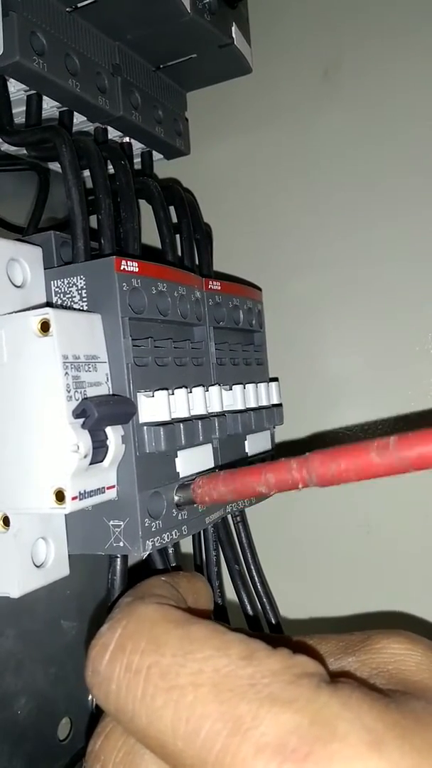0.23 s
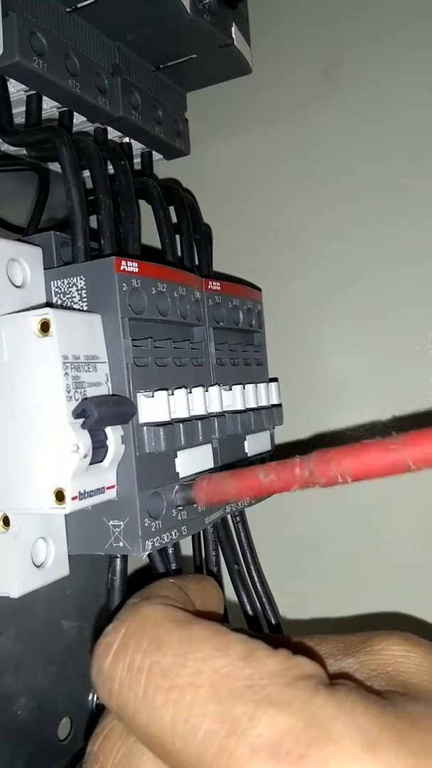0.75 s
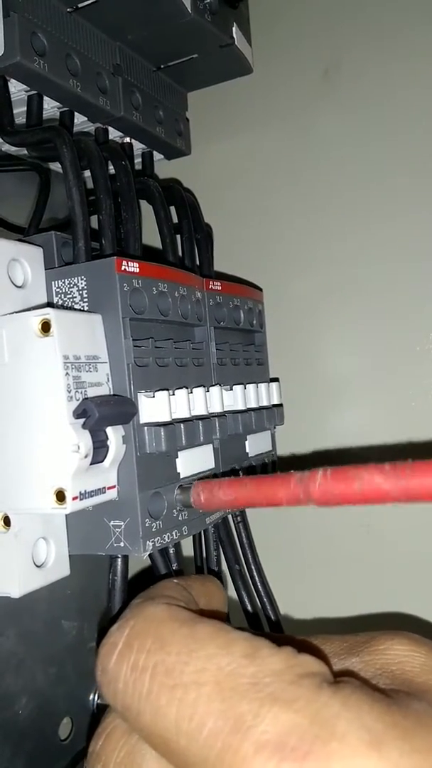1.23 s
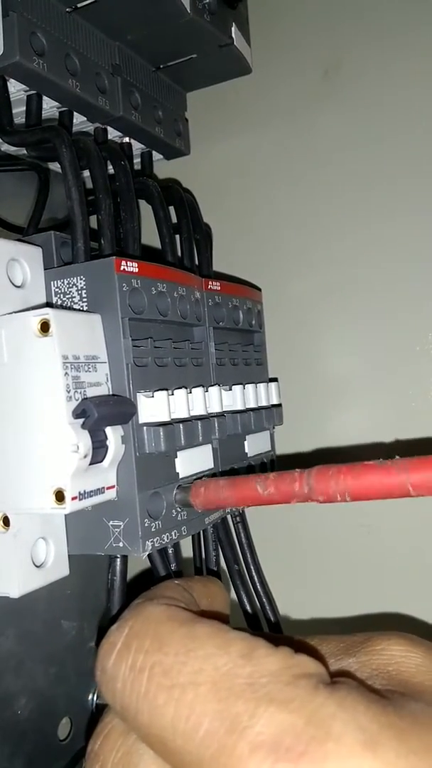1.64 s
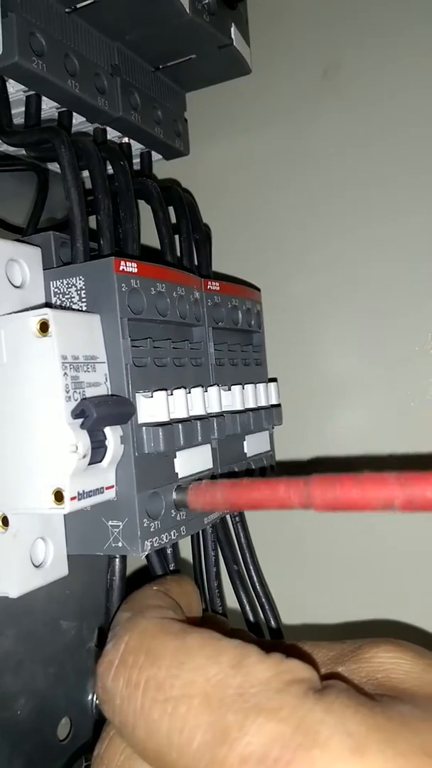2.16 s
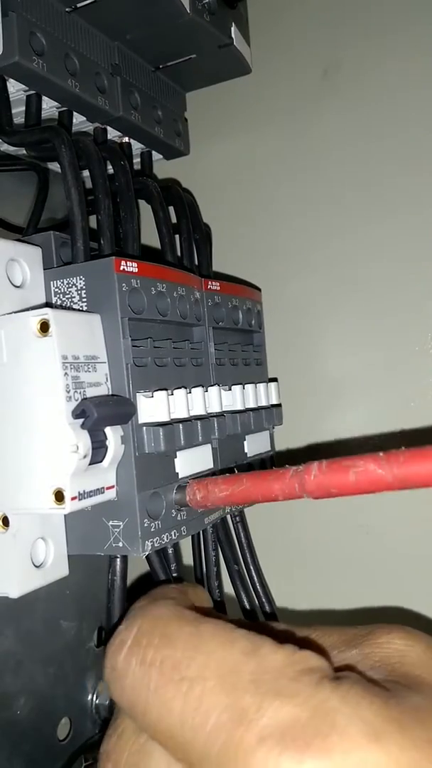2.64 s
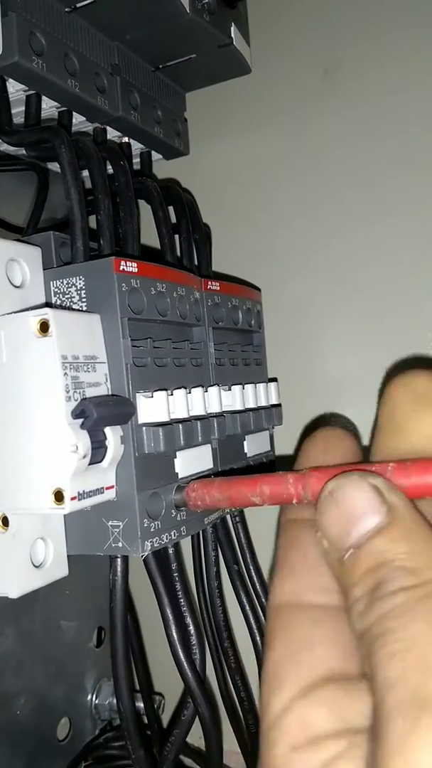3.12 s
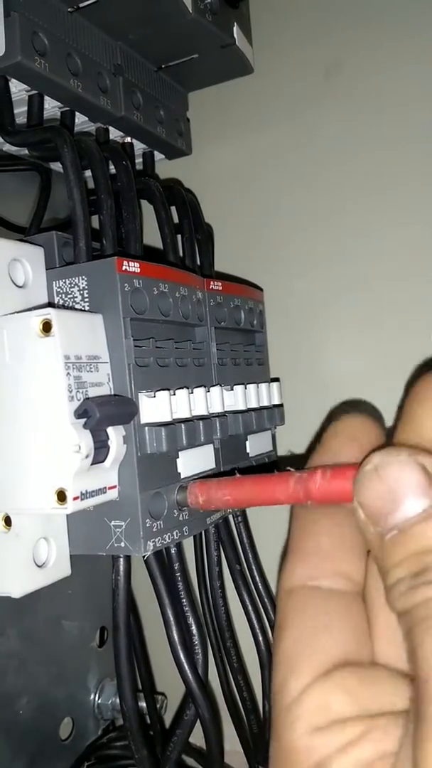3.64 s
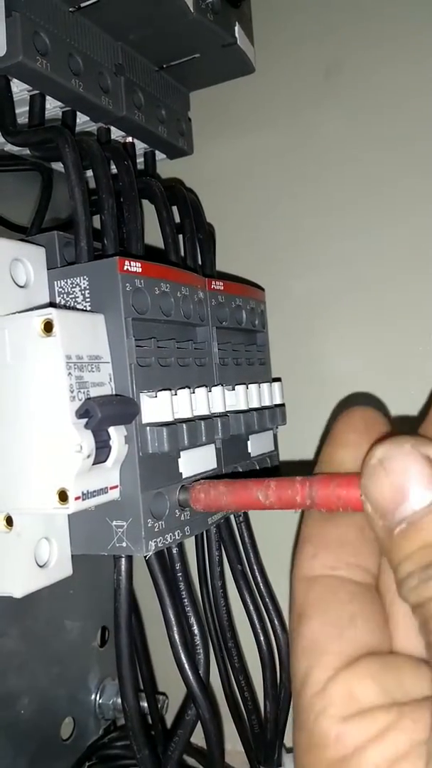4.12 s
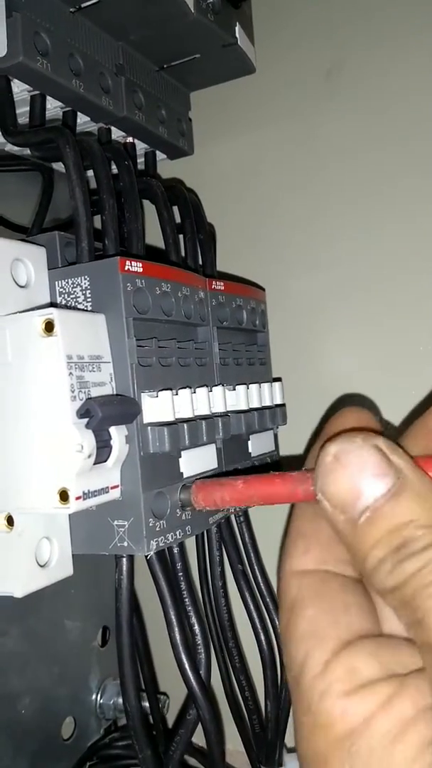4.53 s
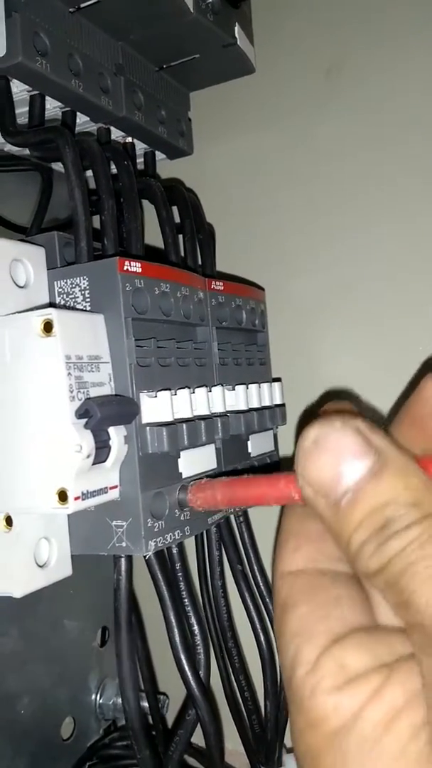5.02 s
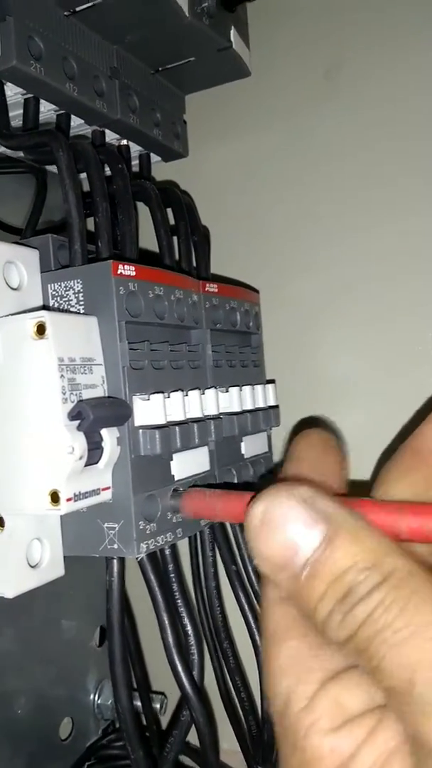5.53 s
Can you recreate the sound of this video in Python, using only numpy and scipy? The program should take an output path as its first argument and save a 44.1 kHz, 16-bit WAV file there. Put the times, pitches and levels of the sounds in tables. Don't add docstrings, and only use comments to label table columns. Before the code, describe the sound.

Sharp metallic clicks and dry scrapes of a screwdriver slipping in a terminal screw, very close, inside a small steel cabinet, after early low handling rumble.

```python
import sys
import numpy as np
from scipy import signal
from scipy.io import wavfile
from scipy.ndimage import uniform_filter1d

SR = 44100
rng = np.random.default_rng(int(sys.argv[2]) if len(sys.argv) > 2 else 0)


def transcribe(u):
    v = np.clip(np.atleast_2d(u).T, -1, 1)
    q = np.round(v * 32767).astype(np.int16)
    wavfile.write(sys.argv[1], SR, q)


def magnitude_from_level(level_db):
    exponent = np.asarray(level_db, float) / 20
    return 10 ** exponent


N = 254898


def evened(x):
    return x / np.sqrt(np.mean(x ** 2) + 1e-20)


def smoothed_twice(x, width):
    return uniform_filter1d(uniform_filter1d(x, width), width)


def read(points, hz):
    f, value = np.transpose(points)
    return np.interp(np.log(hz + 1), np.log(f + 1), value)


def colour(points):
    log_gain = np.log(magnitude_from_level(read(points, abs(np.fft.fftfreq(4096, 1 / SR)))))
    phase = -signal.hilbert(log_gain).imag
    h = np.fft.ifft(np.exp(log_gain + 1j * phase)).real[:1024]
    return h / np.linalg.norm(h)


def rings(modes, detune=0, uneven_db=0, seconds=0.27):
    t = np.arange(round(SR * seconds)) / SR
    hz, db, t60 = np.transpose(modes)[:, :, None]
    shift, lift = rng.standard_normal((2, len(modes), 1))
    decay = magnitude_from_level(db + uneven_db * lift - 60 * t / t60)
    h = (decay * np.sin(2 * np.pi * hz * (1 + detune * shift) * t)).sum(0)
    return h / np.linalg.norm(h)


def through(x, h):
    return signal.oaconvolve(np.atleast_2d(x), np.atleast_2d(h), axes=1)[:, :np.shape(x)[-1]]


def curve(rows, column, rest_db):
    open_s = 0.0047
    rows = np.array(rows)[:, :, None]
    t = np.arange(0, N + 64, 64) / SR
    start, hold, fade = rows[:, 0], rows[:, 1], rows[:, 2]
    age = t - start
    level = magnitude_from_level(rows[:, column] - fade * np.maximum(age - hold, 0))
    each = np.clip(age / open_s, 0, 1) * level
    return np.interp(np.arange(N) / SR, t, np.sqrt((each ** 2).sum(0) + magnitude_from_level(2 * rest_db)))


def grit(spread_db, size=N):
    grain = magnitude_from_level(spread_db * np.minimum(rng.exponential(1, (2, size)), 5))
    return evened(grain * rng.standard_normal((2, size)))


def unsteady(depth_db, width):
    return magnitude_from_level(depth_db * evened(smoothed_twice(rng.standard_normal(N), width)))


# (start [s], hold [s], fade [dB/s], scrape [dB], housing rustle [dB])
RUBS = [(0, 0.023, 279, -59.5, -68), (.176, 0.1, 171, -49.5, -64.5), (.43, 0.086, 105, -55, -74),
        (.835, 0.3, 65, -52.5, -71), (1.3, 0.1, 52, -55, -71), (1.7, 0.13, 206, -52, -74.5),
        (2.025, 0.12, 194.5, -51, -70), (2.25, 0.18, 64, -58.5, -86), (2.588, 0.069, 109, -48, -70),
        (2.86, 0.12, 227.5, -50.5, -84), (3.29, 0.043, 903, -69, -98), (3.33, 0.054, 150, -39.5, -75.5),
        (2.312, 0.051, 150, -47.5, -65), (3.55, .05, 200, -54, -74), (3.43, .03, 97.5, -47.5, -87),
        (3.48, 0.034, 59.5, -50, -76.5), (.95, .04, 152, -46.5, -59.5), (1.185, 0.024, 152, -47, -62.5),
        (1.65, 0.033, 152, -51, -64), (3.64, 0.062, 63.5, -45.5, -70), (3.955, .07, 200.5, -36.5, -53.5),
        (4.72, 0.032, 250, -45, -62), (5.16, 0.036, 298, -51, -62.5), (4.03, 0.11, 133, -36.5, -59),
        (4.35, 0.06, 207, -55, -72.5), (4.588, 0.24, 156, -53, -84), (4.965, 0.011, 174.5, -45.5, -63.5),
        (5.338, 0.0078, 205.5, -45.5, -54.5), (5.43, 0.0099, 241, -45, -62.5),
        (5.66, 0.062, 102, -55.5, -51)]
# (frequency [Hz], level [dB])
SCRAPE_COLOUR = [(3000, 6), (4700, 1.5), (5300, 9.5), (6800, 0.5), (9000, 1), (12000, 8.5), (14000, 13.5),
                 (16000, 0.5)]


def scrape(rough):
    return curve(RUBS, column=3, rest_db=-82.5) * rough * through(grit(spread_db=1.8), colour(SCRAPE_COLOUR))


# (frequency [Hz], density [dB per Hz])
RUSTLE_COLOUR = [(240, -40), (400, -14.5), (598, 4), (812, -15.5), (1040, -3), (2260, -12.5), (3600, -17),
                 (5000, -15), (6500, -10), (11000, -120)]


def rustle():
    return curve(RUBS, column=4, rest_db=-83) * through(grit(spread_db=3.0), colour(RUSTLE_COLOUR))


# (start [s], hold [s], fade [dB/s], plate rumble [dB], deep rumble [dB])
GRIPS = [(.012, 0.013, 602, -40, -56), (.033, 0.074, 403, -34, -60), (.075, 0.067, 404, -32.5, -63),
         (.13, 0.02, 507, -30.5, -41), (.175, 0.049, 400, -31.5, -66), (.395, 0.0049, 600, -51, -52),
         (.474, 0.011, 600, -39.5, -46), (.54, 0.0043, 600, -50, -65), (.65, 0.0095, 506, -50, -65),
         (.23, 0.13, 254, -36.5, -74), (.43, 0.11, 40.5, -54.5, -69.5), (2.585, 0.18, 301, -61, -53.5),
         (2.8, 0.082, 295, -70, -50), (2.89, 0.061, 306, -52, -50.5), (2.99, .05, 500, -60.5, -54),
         (4.94, 0.0117, 497, -61.5, -50), (5.39, 0.0084, 500, -52, -64), (4.085, 0.05, 136, -49, -66),
         (1.63, 0.017, 205, -45.5, -52.5), (3.61, 0.033, 145, -46.5, -61), (3.98, 0.024, 499, -56, -57.5),
         (4.19, 0.0092, 603, -53, -74.5), (4.365, 0.011, 498, -56.5, -70), (4.7, 0.048, 302.5, -72, -61),
         (5.32, 0.026, 64, -64, -57), (5.66, 0.024, 296.5, -47, -71), (5.72, 0.055, 100, -47, -76)]
# (frequency [Hz], level [dB], t60 [s])
PLATE = [(161.1, 17.5, 0.055), (221.9, 4.5, 0.37), (251.6, 9, 0.14), (283.3, 1.5, 0.2), (408.5, -25, 0.027),
         (474, -16.5, 0.056), (750, -24.5, 0.083)]
# (frequency [Hz], level [dB], t60 [s])
PLATE_DEEP = [(61.6, -14.5, .06), (89.5, 1.5, 0.048), (128, 0, 0.057)]


def rumble():
    shared, own = rng.standard_normal((2, N))
    hand = unsteady(depth_db=2.2, width=400) * (shared + .1 * own * [[1], [-1]])
    middle = evened(through(hand, rings(PLATE)))
    deep = evened(through(through(hand, rings(PLATE_DEEP)), np.hanning(150)))
    return curve(GRIPS, column=3, rest_db=-69) * middle + curve(GRIPS, column=4, rest_db=-72) * deep


# (start [s], end [s], frequency [Hz], width [Hz], level [dB])
SQUEAKS = [
    (0.039, 0.14, 616, 7.7, -45.5),
    (0.281, 0.363, 598, 21, -55),
    (0.387, 0.504, 593, 30, -62),
    (0.516, 0.622, 608, 28, -64),
    (0.956, 1.1, 1100, 90, -62.5),
    (2.903, 3.048, 611, 25, -74.5),
    (3.499, 3.958, 1096, 47, -66.5),
    (4.419, 4.657, 1790, 132, -81),
    (5.216, 5.617, 1550, 70, -75),
]


def squeaks():
    out = np.zeros(N)
    for start, end, hz, width, db in SQUEAKS:
        part = out[round(start * SR):round(end * SR)]
        tone = through(rng.standard_normal(len(part)), rings([(hz, 0, 2.2 / width)]))[0]
        part += magnitude_from_level(db) * evened(tone) * signal.windows.tukey(len(part), .6)
    return out


# (frequency [Hz], level [dB], t60 [s])
SHAFT = [(4050, -2, .025), (5650, 0, .03), (6200, -2, .025), (6710, 6, .016), (7430, 2, .03),
         (7900, 0, .025), (8900, 2, .03), (9510, 0, .025), (10700, 0, .03), (12100, 0, .03)]
# (frequency [Hz], level [dB], t60 [s])
HOUSING = [(760, 2, .04), (915, -8, .03), (1250, -6, .022), (1560, -8, .025), (1870, -6, .02),
           (2080, 1, .016), (2330, -8, .02), (2770, -8, .015)]
# (frequency [Hz], level [dB], t60 [s])
THUD = [(200, -14, .08), (275, -3, .055), (395, 0, .038), (520, -4, .025), (620, -4, .035), (780, -8, .03),
        (1010, -15, .02)]


def strike(db, knock_db, thud_db, ms):
    size = 4000
    ms = np.clip(ms, .2, 5)
    u = np.arange(size) / SR * 680 / ms
    swell = u * np.exp(1 - u)
    late_ms = np.arange(size) * 1000 / SR - 1.47 * ms
    rattle = magnitude_from_level(db - 14.5 - late_ms) * np.clip(late_ms, 0, 1)
    bunched = magnitude_from_level(2 * evened(uniform_filter1d(rng.standard_normal(size), size=30)) - .5)
    force = (magnitude_from_level(db) * swell ** 3.4 + rattle) * bunched

    lean = magnitude_from_level([[.75], [-.75]])
    chatter = magnitude_from_level(-0.5) * force * grit(spread_db=3.5, size=size) * lean
    click = chatter + magnitude_from_level(-18) * through(chatter, rings(SHAFT, detune=.02, uneven_db=4, seconds=.04))

    drive = magnitude_from_level(knock_db) * force * grit(spread_db=2.0, size=size)
    knock = drive + magnitude_from_level(-9) * through(drive, rings(HOUSING, detune=.04, uneven_db=5, seconds=.05))

    shared, own = rng.standard_normal((2, size))
    blow = magnitude_from_level(db - 2) * swell ** 110
    jolt = 1.72 * force + magnitude_from_level(db - 18) * np.exp(-u / 9) * (u > 1)
    push = magnitude_from_level(thud_db) * (blow + jolt * (shared + 0.17 * own * [[1], [-1]]))
    thud = through(push, rings(THUD, detune=.05, uneven_db=2, seconds=.09))
    return np.array([click, knock, thud])


def laid_out(rows):
    out = np.zeros((3, 2, N + 4000))
    for s, db, knock_db, thud_db, ms in rows:
        at = round((s - .0036) * SR)
        out[:, :, at:at + 4000] += strike(db, knock_db, thud_db, ms)
    return out[:, :, :N]


# (time [s], click [dB], housing knock [dB re click], plate thud [dB re click])
BUMPS = [(0.173, -44.5, 4, 10), (0.405, -72.5, -2, 19), (4.779, -62.5, -8, -15), (5.031, -61, 4, 2),
         (0.915, -37.5, -1.5, -3), (1.672, -38.5, -16, -19.5), (2.254, -65, -20, -0.5),
         (2.3825, -28, -18.5, -28.5), (2.796, -33.5, -2.5, -1), (2.831, -44, -27, -0.5),
         (2.928, -58, -20, 8), (3.576, -41.5, -13, -15.5), (3.609, -29.5, 0, -31),
         (4.022, -37.5, -5, -14.5), (4.036, -18, -11.5, -16.5), (4.055, -32, 3.5, 0.5),
         (4.067, -29.5, -17.5, -7), (4.195, -53, -5, 3), (4.757, -57.5, -9, 6), (4.817, -63, 3, -2.5),
         (4.911, -73, 0.5, -6), (2.373, -52, -4.5, 7.5), (4.838, -50.5, -3.5, -13.5),
         (5.009, -49, -2.5, 2.5), (5.201, -55.5, -13, -5), (5.3367, -56, 12.5, -31), (5.391, -52, -29, -12),
         (5.447, -60, -12, -1), (5.6632, -21.5, 3, -6.5), (5.672, -35, -24, 2.5),
         (5.7208, -36.5, -35.5, -7)]


def bumps():
    return laid_out([(*row, 2.6) for row in BUMPS])


# (time [s], click [dB], chatter length [ms])
TICKS = [(0.351, -49.5, 0.7), (0.4065, -38.5, 4), (0.4489, -33.5, 3.5), (0.888, -48, 3.5),
         (0.8981, -35, 2.9), (0.977, -33.5, 2.4), (1.343, -38, 2.2), (1.414, -37, 2), (1.676, -30, 1.56),
         (1.095, -38.5, 0.94), (1.578, -47, 3.6), (1.7922, -41.5, 3.5), (2.2477, -49, 2), (2.323, -34, 5.6),
         (2.5929, -53, 2.8), (2.812, -39, 3.46), (2.851, -53, 4.3), (3.327, -27.5, 2), (3.365, -37, 1.5),
         (3.446, -42, 2.9), (3.4726, -31.5, 2), (3.519, -43, 3), (3.848, -39, 3.8), (3.5112, -40, 4.6),
         (3.5573, -40.5, 1.3), (4.3035, -32, 1.75), (4.3356, -35.5, 1), (4.682, -52.5, 3.1),
         (4.978, -36.5, 2), (5.256, -39, 3.2), (5.432, -38.5, 3.7), (5.483, -49, 2.4), (5.609, -30, 1.7),
         (4.44, -53, 1.36), (5.12, -46, 1.5), (5.69, -32.5, 2.7)]


def ticks():
    return laid_out([(s, db, -23, -34.5, ms) for s, db, ms in TICKS])


# (time [s], click [dB], housing knock [dB re click], plate thud [dB re click], chatter length [ms])
SLIPS = [(0.9449, -8, -22.5, -65, 2.73), (1.112, -17.5, -22.5, -56, 3), (1.177, -9.5, -24, -37, 3.3),
         (1.349, -24, -25.5, -43.5, 2.8), (1.4216, -24.5, -29, -56, 2.8), (1.5942, -11.5, -25.5, -65, 3.8),
         (1.6467, -9, -20.5, -51, 3.7), (1.6918, -25, -22, -28.5, 2.9), (2.09, -17.5, -22.5, -69, 2.7),
         (2.344, -28, -7, -10, 2.5), (2.351, -18.5, -21, -26, 2.5), (2.8987, -22, -19, -62, 3),
         (3.33, -23, -18.5, -61, 3), (3.3726, -33, -25.5, -42, 3.3), (3.4237, -28, -26.5, -61, 3.1),
         (3.473, -21.5, -21, -75, 3.9), (3.6139, -5, -19.5, -40.5, 3.2), (3.853, -27, -27, -49, 4),
         (3.9442, -9, -20.5, -54.5, 2.67), (3.983, -31, -24.5, -21, 2.2), (4.0853, -1, -21, -30, 2.6),
         (4.2789, -31, -17, -51, 3), (4.7035, -28, -16.5, -38, 5.5), (4.7092, -15.5, -22.5, -39, 2.9),
         (4.97, -30, -37, -32.5, 1.3), (5.025, -22.5, -26, -32, 2.3), (5.1047, -15.5, -19, -61, 3.2),
         (5.1506, -20, -24.5, -61, 3.46), (5.612, -18.5, -20, -50, 2.6)]


def slips():
    return laid_out(SLIPS)


# (frequency [Hz], t60 [s])
CABINET = [(300, 0.21), (2000, 0.18), (7000, 0.29), (14000, 0.23)]


def echoes():
    taps = np.zeros((2, SR // 2))
    slots = np.arange(300, SR // 2 - 12, 12)
    at = slots + rng.integers(0, 12, (2, len(slots)))
    np.put_along_axis(taps, at, rng.choice([-1., 1.], at.shape), 1)
    hz, t, z = signal.stft(taps, SR, nperseg=256)
    tail = signal.istft(z * magnitude_from_level(-60 * t / read(CABINET, hz)[:, None]), SR, nperseg=256)[1]
    return tail / np.linalg.norm(tail[0])


# (frequency [Hz], level [dB])
LEFT_PORT = [(1000, -13), (3000, -4.5), (4000, -1.5), (5000, 7), (5700, 11), (6700, 20.5), (7500, 17),
             (8500, 8.5), (9500, 6), (11000, -3.5), (13500, -11.5), (15500, -30.5), (16500, -19),
             (17500, -66.5)]
# (frequency [Hz], level [dB])
RIGHT_PORT = [(1000, -8), (3000, -3), (4000, 2), (5000, 0), (5700, 3), (6700, 9), (7500, 12), (8800, 12.5),
              (9800, 9), (11000, 4), (13500, -7), (15500, 0), (16500, -20), (17500, -60)]


def blade(clicks):
    rough = unsteady(depth_db=2.1, width=200)
    air = clicks + magnitude_from_level(-17.0) * rough ** 0.83 * through(clicks, echoes()) + scrape(rough)
    left = through(air[0], colour(LEFT_PORT))[0]
    right = magnitude_from_level(-6.0) * through(air[1], colour(RIGHT_PORT))[0]
    return np.array([left, right])


def housing(knocks):
    plastic = colour([(300, -36.5), (700, -9.5), (1500, -4.0), (4000, -0.5), (7000, -19.0)])
    knocks = through(knocks, plastic)
    return (knocks + magnitude_from_level(-3.5) * through(knocks, echoes()) + magnitude_from_level(3.0) * rustle()) * magnitude_from_level([[1.1], [-1.1]])


def plate(thuds):
    thuds = signal.sosfilt(signal.butter(4, 230, "high", fs=SR, output="sos"), thuds)
    return thuds + magnitude_from_level(-5) * through(thuds, echoes()[:1]) + rumble()


def scene():
    clicks, knocks, thuds = bumps() + ticks() + slips()
    return blade(clicks) + housing(knocks) + plate(thuds) + squeaks()


# (frequency [Hz], margin [dB])
SPARED = [(2200, 40), (3000, 2), (4800, 0), (5300, 8), (8000, 0), (10000, 1), (12000, 6), (16000, 9)]


def starved(x, under_db, patchy_db):
    hz, t, z = signal.stft(x, SR, nperseg=512, noverlap=384)
    power = uniform_filter1d((abs(z) ** 2).sum(0), size=4, axis=0)
    power = uniform_filter1d(power, size=9, axis=1)
    patches = uniform_filter1d(rng.standard_normal(power.shape), size=2, axis=0)
    patches = evened(uniform_filter1d(patches, size=22, axis=1))
    loudest = power[hz > 2400].max(0)
    loudest = np.minimum(loudest, np.roll(loudest, shift=-5))
    need = loudest * magnitude_from_level(2 * (patchy_db * patches - under_db - read(SPARED, hz)[:, None]))
    now = (abs(z) ** 2).sum((0, 1))
    calm = now < 1.9 * uniform_filter1d(now, size=9)
    keep = np.where((power < need) & calm, .03, 1)
    keep = keep * (hz[:, None] < np.where(calm, 15700, 16400))
    return signal.istft(z * keep, SR, nperseg=512, noverlap=384)[1][:, :N]


def band_limit(x):
    return signal.sosfilt(signal.butter(12, 16380, fs=SR, output="sos"), x)


def record(dry):
    overloaded = np.clip(dry, -.88, .88)
    cut = signal.sosfilt(signal.butter(4, 52, "high", fs=SR, output="sos"), overloaded)
    mix = starved(cut, under_db=13, patchy_db=5.5)
    return band_limit(mix)


dry = scene()
out = record(dry)
transcribe(out)
```